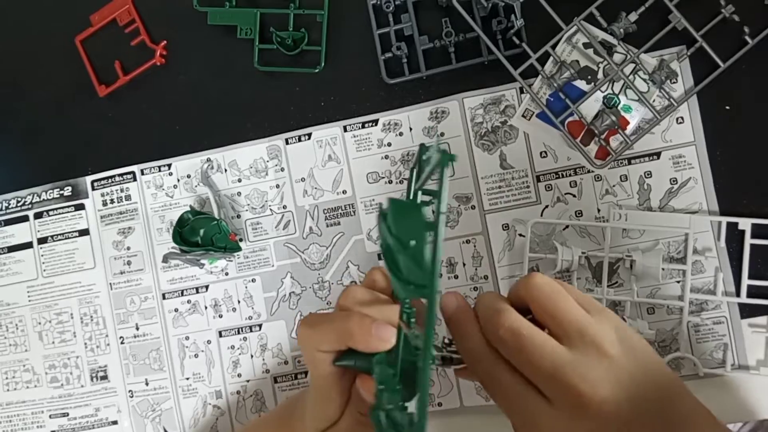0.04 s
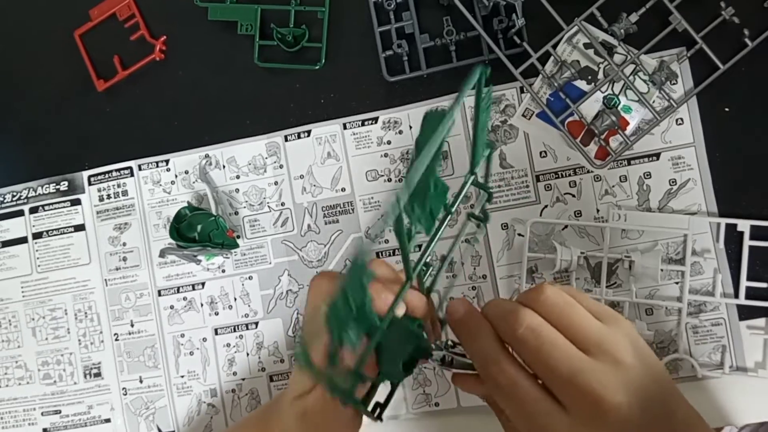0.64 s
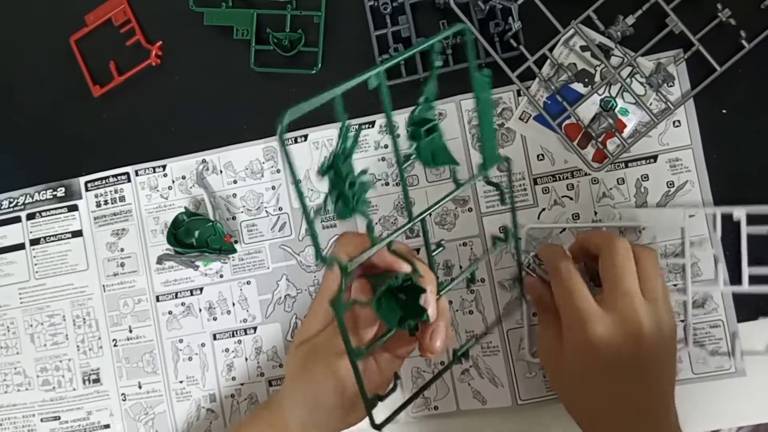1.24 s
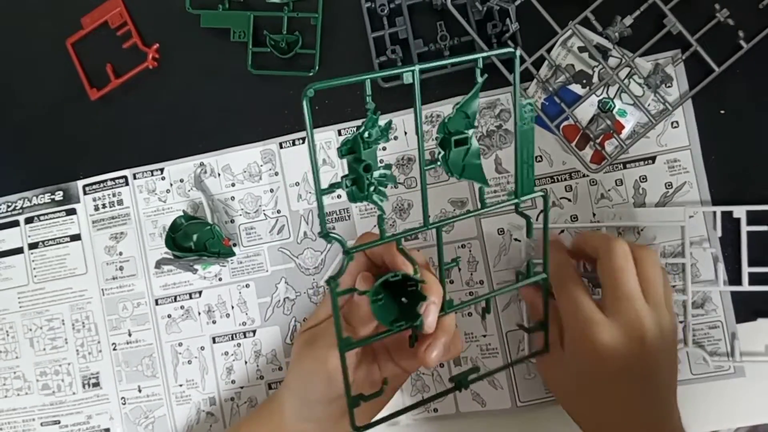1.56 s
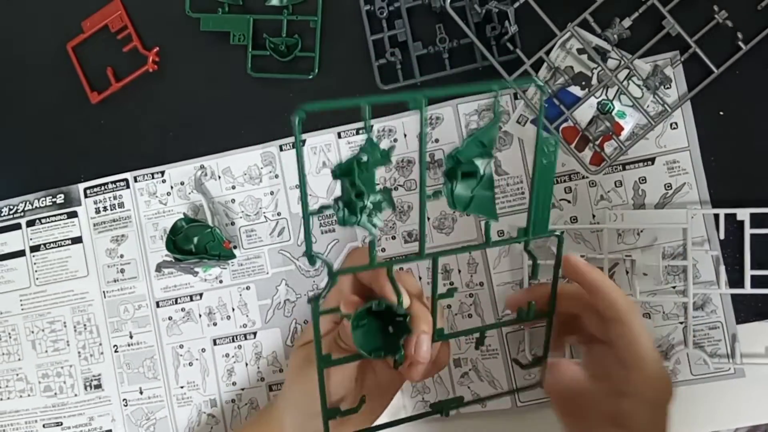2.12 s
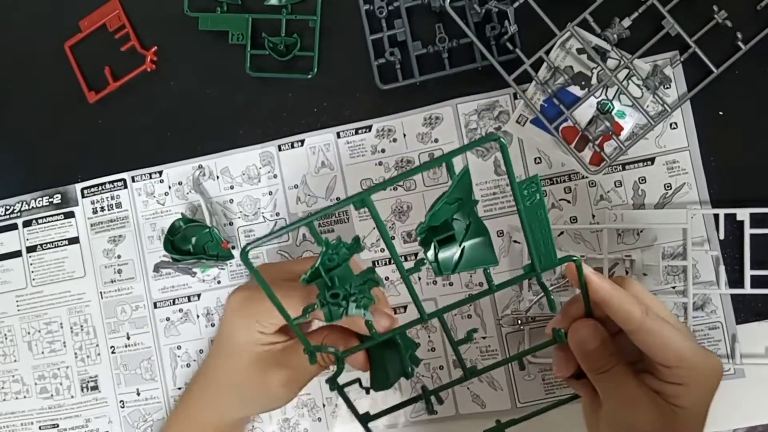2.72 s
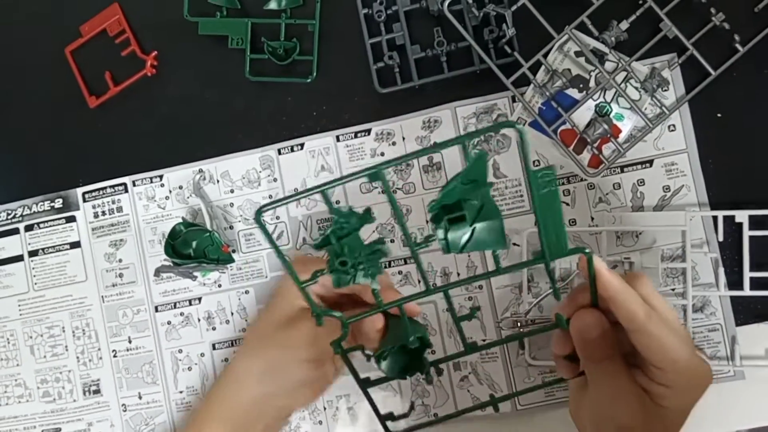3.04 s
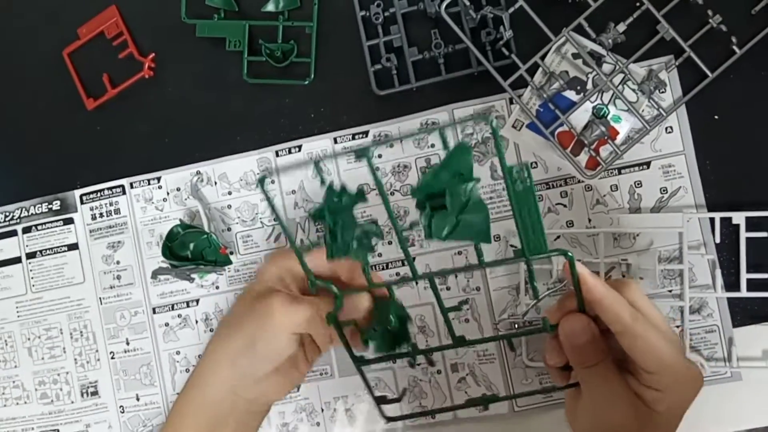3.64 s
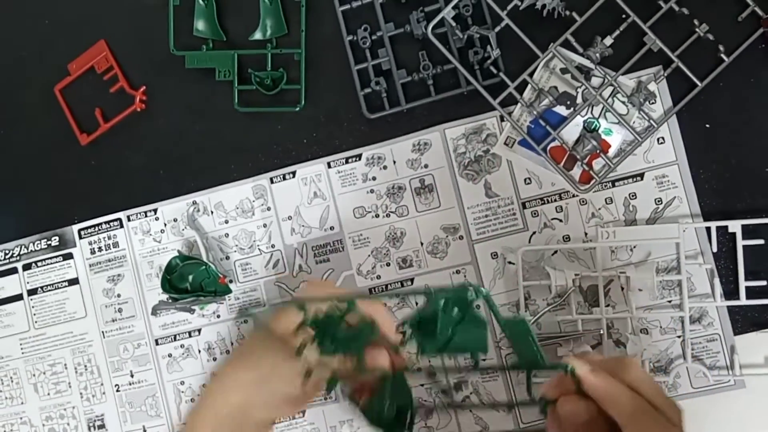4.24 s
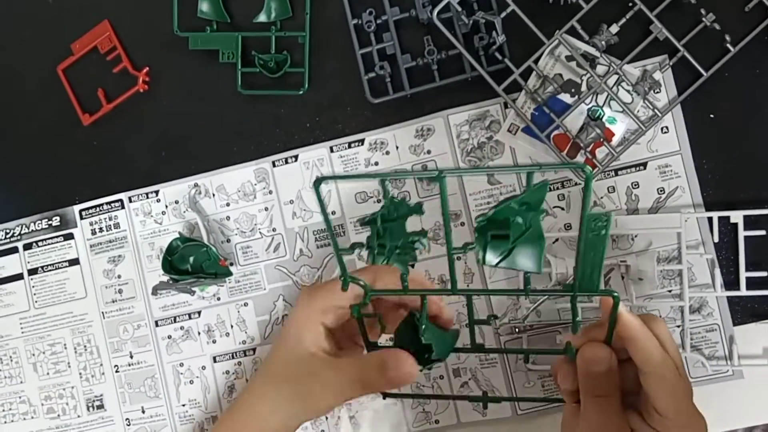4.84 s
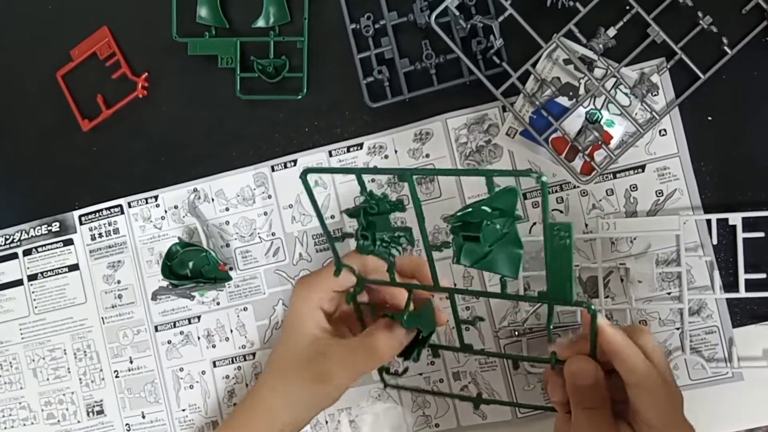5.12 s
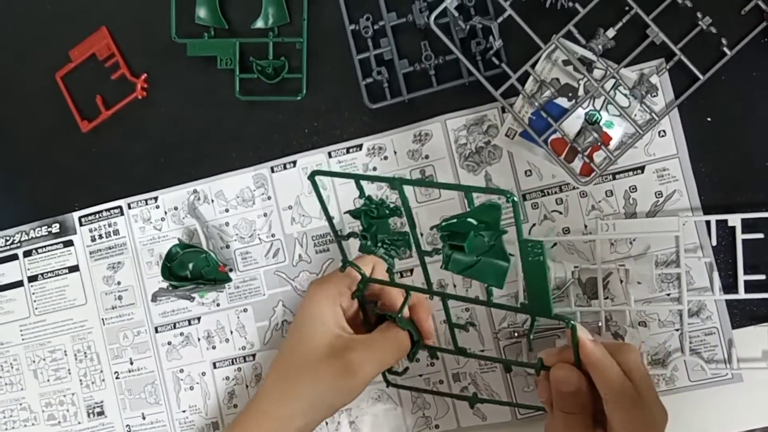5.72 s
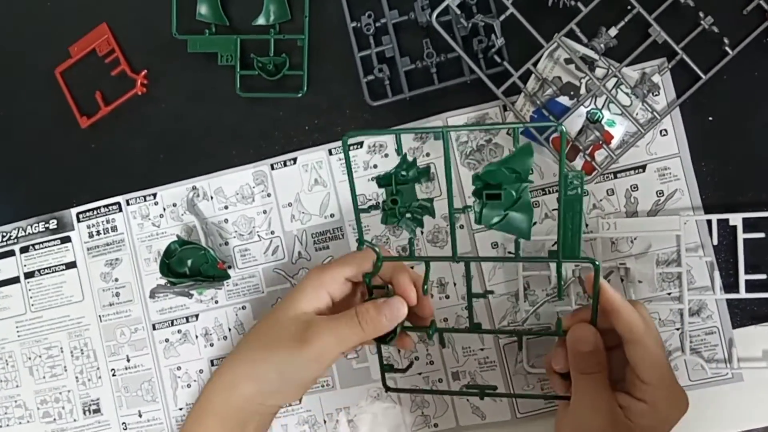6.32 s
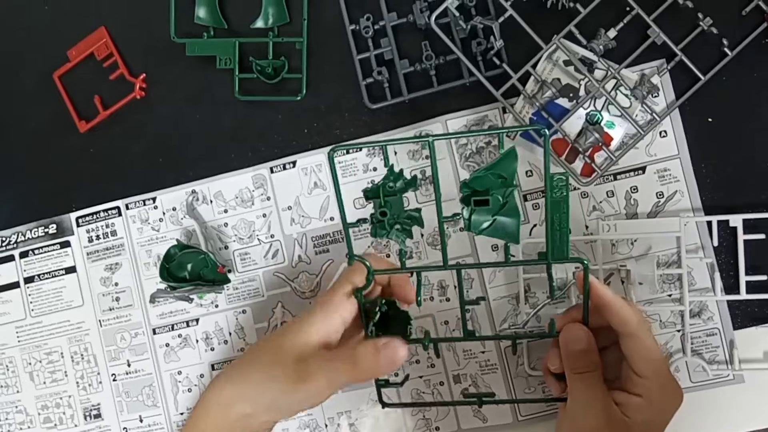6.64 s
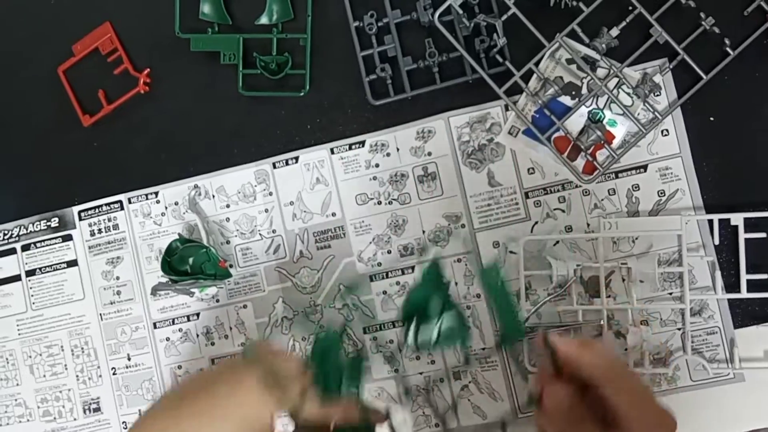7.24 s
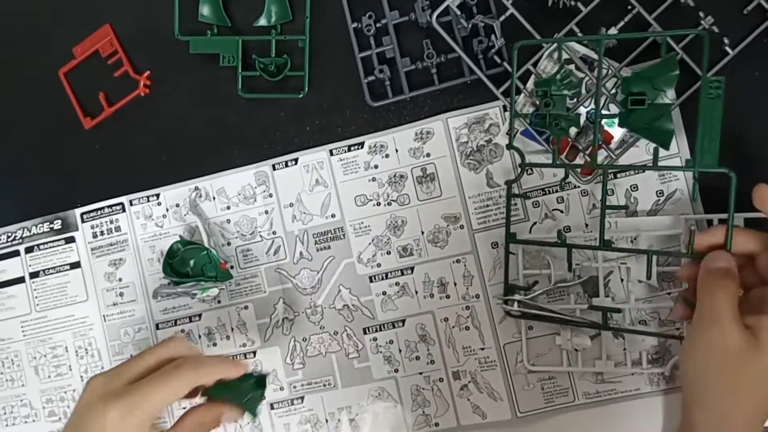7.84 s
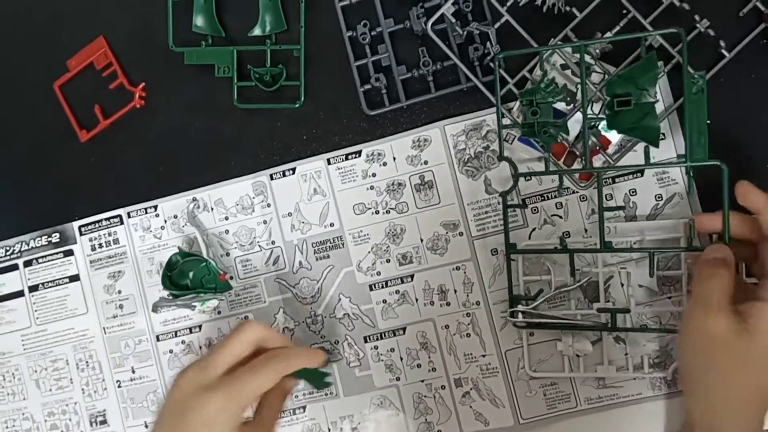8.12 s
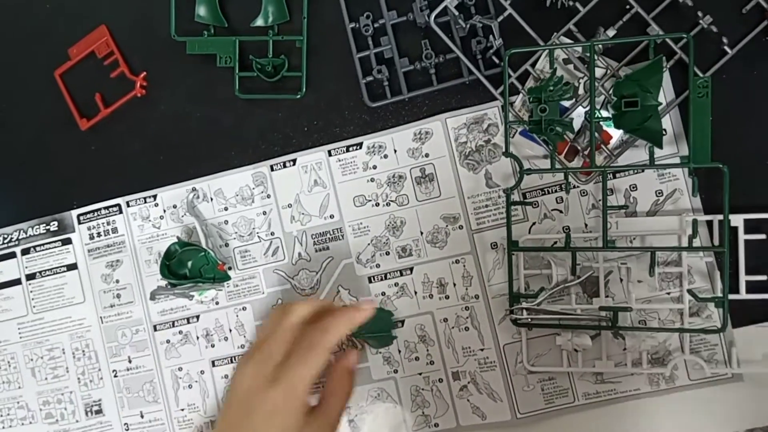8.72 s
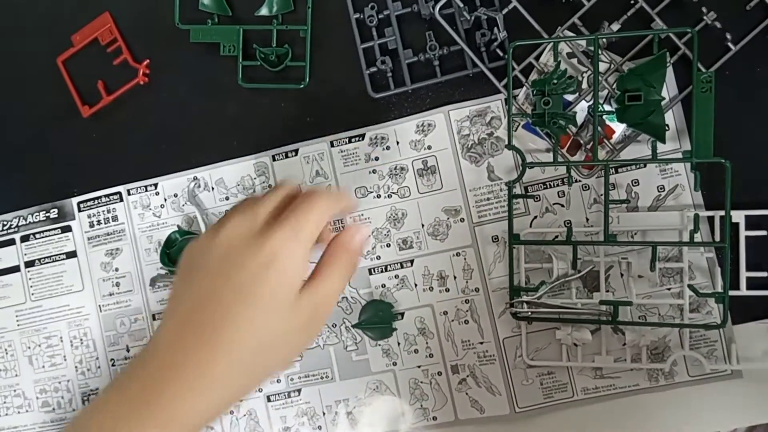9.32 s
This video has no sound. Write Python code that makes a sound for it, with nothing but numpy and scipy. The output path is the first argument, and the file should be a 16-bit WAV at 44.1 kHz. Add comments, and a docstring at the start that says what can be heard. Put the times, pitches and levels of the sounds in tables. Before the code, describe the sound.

Right at the start, nippers cut through a plastic model-kit frame with one sharp, bright snip. A few ticks and a soft thud come around 1.1 seconds. From 1.3 to 1.8 seconds the steel nippers clatter and scrape onto a spare frame, with low desk thuds. The held frame ticks lightly and faintly creaks as a part is twisted. A dry, sharp snap comes at 3.2 seconds, followed by scattered clicks, the clearest at 3.6, and a second snap at 5.4. Sparse ticks continue, with hands softly brushing plastic and paper, mostly from 6.7 to 7.3 seconds. At 7.5 the frame drops onto other frames with a quick clatter and a thud, then settles with faint taps and scraping until about 8.4. Faint brushes follow until 9.5. A low electrical hum and soft air noise fill the small room throughout. The microphone adds a slight treble ring.

```python
"""A plastic model-kit frame is worked by hand at a desk: nippers snip one gate and are laid down, then the
part is twisted until its last two gates snap. Each break or contact is a brief crackle ringing the plastic.
The frame ticks and creaks as it flexes, then clatters onto other frames; the desk thuds, hands brush paper.
Mains hum and soft air noise fill the small room. The microphone has a narrow treble resonance."""
import sys
import numpy as np
from scipy import signal
from scipy.fft import rfft, irfft, next_fast_len
from scipy.io import wavfile
from scipy.ndimage import map_coordinates

SR = 44100
rng = np.random.default_rng(int(sys.argv[2]) if len(sys.argv) > 2 else 0)


def wav_out(sig):
    """Save sig, one row per channel (or a flat mono array), as 16-bit PCM at SR to the path in sys.argv[1]."""
    wavfile.write(sys.argv[1], SR, np.round(np.clip(np.atleast_2d(sig).T, -1, 1) * 32767).astype(np.int16))


N = 422037


def amp(db):
    return 10 ** (np.asarray(db) / 20)


def unit(x):
    return x / np.sqrt(np.mean(x ** 2) + 1e-20)


def along(points, hz):
    """Interpolate (f/Hz, value) points on a log axis."""
    f, v = np.transpose(points)
    return np.interp(np.log(hz + 1), np.log(f + 1), v)


def wobble(rate_hz):
    """Smooth random curve, rate_hz knots a second."""
    knots = rng.standard_normal(int(N * rate_hz / SR) + 4)
    return map_coordinates(knots, [np.arange(N) * rate_hz / SR])


def swell(mid_s, length_s):
    """Gaussian rise and fall."""
    return np.exp(-2 * ((np.arange(N) / SR - mid_s) / length_s) ** 2)


def filtered(x, response):
    """Apply a complex frequency response."""
    size = next_fast_len(len(x) + SR // 2)
    return irfft(rfft(x, size) * response(np.fft.rfftfreq(size, 1 / SR)), size)[:len(x)]


def noise(spectrum):
    """Coloured noise, rms 1."""
    return unit(filtered(rng.standard_normal(N), lambda hz: amp(along(spectrum, hz))))


def add(track, start_s, sound):
    part = track[max(round(start_s * SR), 0):][:len(sound)]
    part += sound[:len(part)]


def resonance(f, hz, width_hz):
    """One damped mode, peak 1."""
    return 1j * f * width_hz / (hz ** 2 - f ** 2 + 1j * f * width_hz)


# room decay: f/Hz, t60/s
ROOM_DECAY = [(300, 0.16), (850, 0.55), (2000, 0.28), (5000, 0.23), (9000, 0.26), (15000, 0.22)]
def room_tail(build_s=0.0016):
    """Diffuse reflections, energy 1; they build up, then last longest in the midrange."""
    hz, t, spectra = signal.stft(rng.standard_normal(SR // 3), SR, nperseg=256)
    decay = amp(-60 * t / along(ROOM_DECAY, hz)[:, None])
    tail = signal.istft(spectra * decay, SR, nperseg=256)[1]
    tail *= 1 - np.exp(-(np.arange(len(tail)) / SR / build_s) ** 2)
    return tail / np.linalg.norm(tail)


def body(f, modes, ring_hz, ring_db, bars_db, bar_count=26):
    """Response of the plastic: main ring, broad modes, fine modes of many thin bars."""
    response = 1 + amp(ring_db) * resonance(f, ring_hz, width_hz=230)
    # grip and point of impact vary each mode's share
    for (hz, width_hz, db), share in zip(modes, rng.standard_normal(len(modes))):
        response += amp(db + 2 * share) * resonance(f, hz, width_hz)
    for hz, share in zip(rng.uniform(2800, 15500, bar_count), rng.standard_normal(bar_count)):
        response += amp(bars_db) * share * resonance(f, hz, width_hz=65)
    return response


# registers (knock, clack, click, crispness): low/Hz, high/Hz
REGISTERS = [(740, 2500), (2500, 6500), (6500, 11000), (11000, 16000)]
def contact(crackle_s, ring_hz, levels_db, modes, ring_db, bars_db, t60_s, later_db, wet_db, count=4):
    """A quick run of tiny fractures or bounces, coloured by plastic and room."""
    tail = room_tail()
    t = np.arange(len(tail)) / SR
    power = amp(-60 * t / t60_s) ** 2
    for k, (when, strength) in enumerate(rng.random((count, 2))):
        age = t - crackle_s * (k + when) / count
        power += (age > 0) * (amp(later_db - 60 * np.abs(age) / t60_s) * strength) ** 2
    crackle = np.sqrt(power) * rng.standard_normal(len(t))
    blow = crackle / np.linalg.norm(crackle) + amp(wet_db) * tail
    response = body(np.fft.rfftfreq(len(t), 1 / SR), modes, ring_hz, ring_db, bars_db)
    ringing = irfft(rfft(blow) * response, len(t))
    sound = np.zeros(len(t))
    for db, edges_hz in zip(levels_db, REGISTERS):
        band = signal.sosfilt(signal.butter(3, edges_hz, 'bandpass', fs=SR, output='sos'), ringing)
        sound += amp(db) * band / np.std(band[:SR // 100])  # level over the first 10 ms
    return sound


def contacts(table, modes, gain_db, **settings):
    """One contact per row; row levels are relative to gain_db."""
    track = np.zeros(N)
    for s, crackle_s, ring_hz, *levels_db in table:
        add(track, s, contact(crackle_s, ring_hz, levels_db, modes, **settings))
    return amp(gain_db) * track


def voiced(table, colour_db, crackle_s, halving_db=5.5):
    """Spread each level over the registers; harder contacts are briefer and brighter."""
    tilt = np.arange(len(REGISTERS)) - (len(REGISTERS) - 1) / 2
    rows = []
    for s, ring_hz, db, hardness in table:
        levels_db = db + np.array(colour_db) + hardness * tilt
        rows.append((s, crackle_s * 2 ** (-hardness / halving_db), ring_hz, *levels_db))
    return rows


# weaker appliance tones: f/Hz, level/dB re mains tone
HUM_TONES = [(71.5, -18), (177.6, -17), (240, -15.5), (403.7, -21), (531.5, -20.5)]
def hum(mains_hz=120, beat_hz=1.84, level_db=-62.5, motor_db=-13.5, waver_db=1.4, drift_rad=0.11):
    """An appliance hums unsteadily; its motor slips behind the mains, so the two beat."""
    t = np.arange(N) / SR - 0.1  # beat peaks at 0.1 s
    track = np.zeros(N)
    for hz, db in [(mains_hz, 0), (mains_hz - beat_hz, motor_db)] + HUM_TONES:
        rms = amp(level_db + db + waver_db * wobble(3.7))
        track += rms * np.sqrt(2) * np.sin(2 * np.pi * hz * t + drift_rad * wobble(7.5))
    return track


# air spectrum: f/Hz, relative density/dB
AIR_SPECTRUM = [(20, -35), (30, -25), (42, -19), (62, 0), (75, -1.5), (95, -4), (150, -1.5), (200, -6.5),
                (400, -10), (600, -13), (1150, -12), (2200, -20), (4000, -29), (7500, -29.5), (9000, -37),
                (16000, -41)]
def air(level_db=-62.5, waver_db=0.27):
    """Soft, nearly steady air noise."""
    return amp(level_db + waver_db * wobble(3.01)) * noise(AIR_SPECTRUM)


# frame modes: f/Hz, width/Hz, gain/dB
FRAME_MODES = [(1190, 310, -2), (1843, 180, 9), (2280, 150, 9), (2840, 280, 7), (3590, 340, 9),
               (4630, 210, 9.5), (5160, 243, 1), (8620, 1000, -1), (9500, 400, -7.5), (12800, 1500, -10)]
# gate cut: t/s, crackle/s, ring/Hz, knock/dB, clack/dB, click/dB, crispness/dB
GATE_CUT = [(0.0215, 0.0018, 4300, -47, -31.5, -31.5, -35)]
def snip():
    """Nippers bite through a gate; the fracture rings the frame."""
    return contacts(GATE_CUT, FRAME_MODES, gain_db=-0.5, ring_db=16, bars_db=10,
                    t60_s=0.014, later_db=-5, wet_db=-2.5)


# creaks: middle t/s, length/s, f/Hz, level/dB
STRAIN_CREAKS = [(.415, 0.021, 4220, -75), (2.524, 0.008, 4980, -62.5), (5.17, .03, 4640, -72),
                 (5.677, 0.023, 9170, -63.5), (5.822, .018, 5480, -68.5), (7.827, 0.11, 3830, -74),
                 (8.306, 0.16, 3570, -80)]
def creaks(width_hz=220):
    """Plastic slips under strain, exciting one narrow resonance at a time."""
    track = np.zeros(N)
    for s, length_s, hz, db in STRAIN_CREAKS:
        ring = filtered(rng.standard_normal(N), lambda f: resonance(f, hz, width_hz) ** 2)
        track += amp(db) * swell(s, length_s) * unit(ring)
    return track


# rub and hiss spectra: f/Hz, relative density/dB
RUB_SPECTRUM = [(60, -34), (110, -3), (150, 12.5), (220, -9.5), (400, -9), (900, -18), (2500, -29),
                (8000, -73)]
HISS_SPECTRUM = [(500, -20), (1500, -3), (3000, -3.5), (6000, -5.5), (9000, -5.5), (12000, -13),
                 (16000, -15)]
# hand strokes: middle t/s, length/s, rub/dB, hiss/dB
HAND_STROKES = [(0.416, 0.027, -75, -81), (0.657, .025, -77, -73.5), (1.127, 0.036, -58, -66),
                (3.616, .025, -76, -59.5), (3.825, 0.032, -78, -61), (4.207, .08, -79, -74),
                (5.172, 0.1, -76, -75), (5.69, .07, -69, -69.5), (6.712, 0.063, -52.5, -69.5),
                (6.845, 0.034, -72, -65), (7.137, 0.14, -56.5, -69), (7.264, 0.16, -59.5, -102),
                (8.083, .05, -61, -64), (8.45, 0.076, -87, -72), (8.797, 0.055, -79, -74),
                (9.209, 0.025, -77.5, -70), (9.347, .044, -86, -71), (9.504, 0.071, -70, -72)]
def hands(grain_db=3, crackle_db=4):
    """Skin catches unevenly as it slides over plastic and paper; the paper crackles finely."""
    rub = unit(amp(grain_db * wobble(260)) * noise(RUB_SPECTRUM))
    hiss = unit(amp(crackle_db * wobble(700)) * noise(HISS_SPECTRUM))
    return sum(swell(s, length_s) * (amp(rub_db) * rub + amp(hiss_db) * hiss)
               for s, length_s, rub_db, hiss_db in HAND_STROKES)


# tick colour: level/dB for each register
TICK_COLOUR = [-6, 1, -1, -11]
# flex ticks: t/s, ring/Hz, level/dB, hardness/dB per register
FLEX_TICKS = [(.5825, 2450, -63.5, -5), (1.08, 3680, -50, -5.5), (1.1467, 3820, -54, 0),
              (1.1874, 3600, -55, -1.5), (1.2543, 2210, -63.5, -5), (2.1233, 4270, -63.5, 4.5),
              (2.1805, 3600, -53, -2.5), (3.124, 5360, -69.5, 2), (3.1979, 5170, -49, 1),
              (3.623, 4700, -59, -.5), (3.6412, 4370, -44, 1), (3.694, 4730, -56, 1.5),
              (3.7028, 3560, -54.5, 0), (3.8224, 4500, -53.5, 2), (4.1807, 3720, -62, -1.5),
              (4.202, 4900, -56.5, 2.5), (4.213, 4930, -62, 4), (4.2435, 4820, -61, -1),
              (4.4585, 4820, -65, -0.5), (4.928, 4530, -58.5, -2), (4.941, 3530, -53, 2),
              (4.982, 4400, -57.5, -2.5), (5.2375, 2210, -67, 7), (5.738, 3670, -49.5, 1.5),
              (5.973, 4470, -60, -2), (5.9888, 2230, -61.5, -4.5), (6.3665, 2630, -52.5, 5),
              (6.5925, 2220, -58, 4.5), (6.847, 2470, -62, 1), (7.0306, 5240, -59.5, -1.5),
              (7.0655, 5640, -53.5, 2), (7.11, 3500, -51.5, 0.5), (7.1412, 5220, -44.5, 1.5),
              (8.1685, 2210, -65, 2.5), (8.2143, 4800, -63, 5)]
def ticks(catch_hz=2600, catch_db=-72, catch_hardness_db=-2.5):
    """The held frame ticks as it flexes, and faintly where a finger catches, once per stroke."""
    catches = [(s + 0.25 * length_s * rng.standard_normal(), catch_hz, catch_db, catch_hardness_db)
               for s, length_s, *_ in HAND_STROKES]
    rows = voiced(FLEX_TICKS + catches, TICK_COLOUR, crackle_s=0.0035)
    return contacts(rows, FRAME_MODES, gain_db=-1, ring_db=21, bars_db=9,
                    t60_s=0.024, later_db=-2, wet_db=-8.5)


# thuds: t/s, level/dB
DESK_THUDS = [(1.094, -50), (1.545, -55), (1.586, -49), (1.675, -65), (1.702, -46.5), (1.745, -63),
              (7.546, -54.5)]
def desk(thud_hz=145, t60_s=0.19, attack_s=0.0023):
    """The padded desk gives a short low thud as weight lands."""
    track, t = np.zeros(N), np.arange(SR // 4) / SR
    envelope = amp(-60 * t / t60_s) * (1 - np.exp(-t / attack_s))
    for s, db in DESK_THUDS:
        add(track, s, amp(db) * envelope * np.sin(2 * np.pi * thud_hz * t))
    return track


def clatter(table, colour_db, flight_s=0.025, loss_db=17.5):
    """A piece lands on a frame; each impact rebounds once, softer."""
    flights_s = flight_s * np.exp(0.33 * rng.standard_normal(len(table)))
    rebounds = [(s + delay_s, ring_hz, db - loss_db, hardness)
                for (s, ring_hz, db, hardness), delay_s in zip(table, flights_s)]
    rows = voiced(table + rebounds, colour_db, crackle_s=0.0024)
    return contacts(rows, FRAME_MODES, gain_db=-1.5, ring_db=15, bars_db=9,
                    t60_s=0.016, later_db=2, wet_db=-6)


# steel-on-plastic colour: level/dB for each register
NIPPER_COLOUR = [-6, -0.5, 0, -16]
# nipper impacts: t/s, ring/Hz, level/dB, hardness/dB per register
NIPPER_IMPACTS = [(1.2855, 3750, -53.5, -3), (1.3008, 3800, -52.5, 2.5), (1.3253, 3510, -62, -6),
                  (1.4182, 3770, -50, 3), (1.4955, 2820, -45, 2.5), (1.5149, 2440, -50.5, -7.5),
                  (1.544, 2980, -43, 2.5), (1.622, 3490, -56, -4), (1.665, 3730, -43, 2.5),
                  (1.685, 2860, -47, -1), (1.6955, 2850, -38, 1.5), (1.7105, 3840, -44.5, -0.5),
                  (1.731, 2410, -52, -4), (1.771, 2380, -66, -5)]
def nippers_down():
    """The steel nippers are laid on a spare frame."""
    return clatter(NIPPER_IMPACTS, NIPPER_COLOUR)


# scrape spectrum: f/Hz, relative density/dB
SCRAPE_SPECTRUM = [(120, -15), (260, 7), (500, -0.5), (900, -1), (1300, 4), (2300, -5), (4000, 1),
                   (6000, -9), (9000, 0.5), (11000, -43), (16000, -24)]
# plastic over plastic: middle t/s, length/s, level/dB
EDGE_RATTLES = [(1.308, 0.031, -56.5), (1.549, 0.02, -50.5), (1.573, 0.042, -52.5), (1.687, 0.022, -46.5),
                (1.723, 0.031, -52.5), (1.78, 0.022, -59), (7.584, 0.036, -55), (7.87, 0.044, -74),
                (8.08, 0.037, -67), (8.29, 0.31, -78.5)]
def rattle(grain_db=4):
    """Edges skip over the bars of the frames below in a dense run of tiny catches."""
    pressure = sum(amp(db) * swell(s, length_s) for s, length_s, db in EDGE_RATTLES)
    return pressure * unit(amp(grain_db * wobble(500)) * noise(SCRAPE_SPECTRUM))


# modes of the shell-shaped part: f/Hz, width/Hz, gain/dB
PART_MODES = [(855, 86, 14.5), (1645, 180, 6.5), (2360, 47, 11), (3340, 200, 8.5), (5300, 160, 8),
              (7300, 500, 0), (8920, 1100, 6.5), (10800, 600, 3), (13500, 1200, 10)]
# gate breaks: t/s, crackle/s, ring/Hz, knock/dB, clack/dB, click/dB, crispness/dB
GATE_SNAPS = [(3.2072, 0.0046, 4700, -45, -37, -35, -35.5), (5.3544, 0.0042, 3780, -46, -44, -36, -41)]
def snaps():
    """Twisted gates break, dry and sharp, ringing the part."""
    return contacts(GATE_SNAPS, PART_MODES, gain_db=0, ring_db=11, bars_db=5.5,
                    t60_s=0.011, later_db=1.5, wet_db=-9)


# frame-on-frame colour: level/dB for each register
LANDING_COLOUR = [-4, 0.5, 1, -13.5]
# frame impacts: t/s, ring/Hz, level/dB, hardness/dB per register
FRAME_LANDINGS = [(7.4977, 2210, -43, 6.5), (7.5237, 2300, -48, -6.5), (7.5453, 2320, -39.5, 0.5),
                  (7.578, 2210, -52, 1), (7.7365, 2350, -64, -7), (7.8675, 2800, -60.5, -5),
                  (7.985, 2710, -67.5, -4.5), (8.0426, 3220, -70, -7), (8.0833, 2710, -60.5, -5)]
def frame_drop():
    """The cut frame drops on the pile and settles."""
    return clatter(FRAME_LANDINGS, LANDING_COLOUR)


def scene():
    plastic = snip() + creaks() + ticks() + nippers_down() + rattle() + snaps() + frame_drop()
    return (plastic + hum() + air() + hands() + desk())[None]


def record(dry, port_hz=8650, port_width_hz=560, port_db=11, top_hz=15800):
    """The microphone port rings in the treble; a steep low-pass limits the band."""
    coloured = filtered(dry[0], lambda f: 1 + amp(port_db) * resonance(f, port_hz, port_width_hz))
    return filtered(coloured, lambda f: 1 / np.sqrt(1 + (f / top_hz) ** 200))[None]


dry = scene()
out = record(dry)
wav_out(out)
```